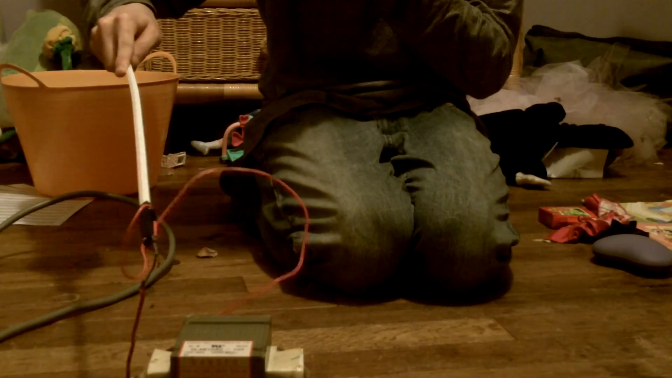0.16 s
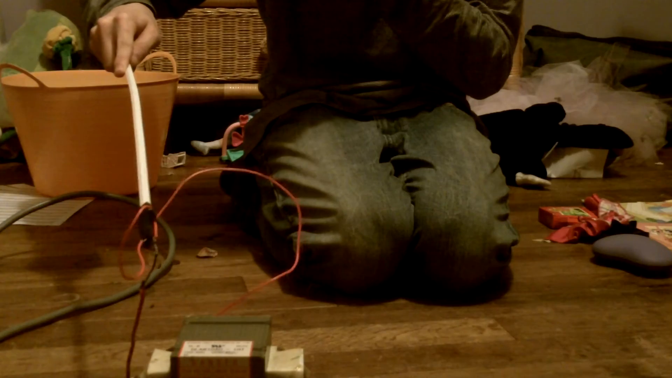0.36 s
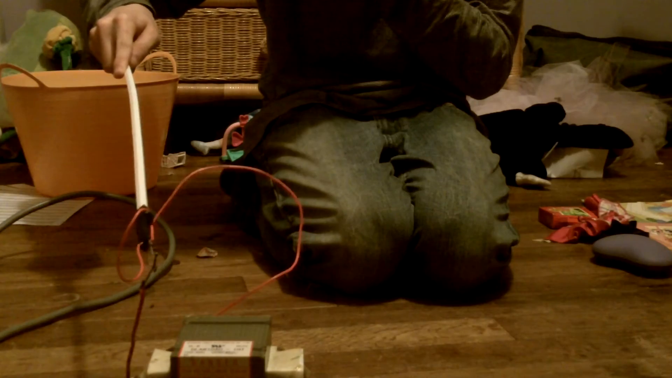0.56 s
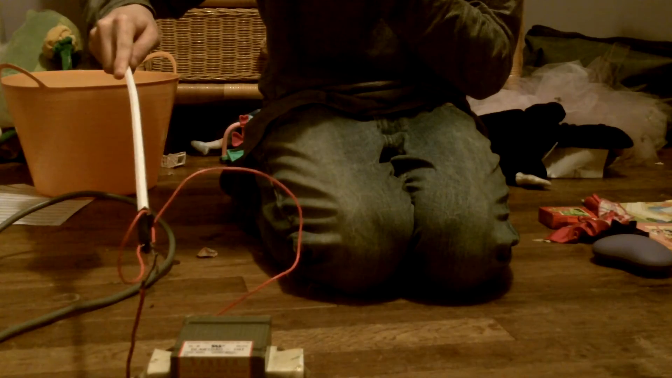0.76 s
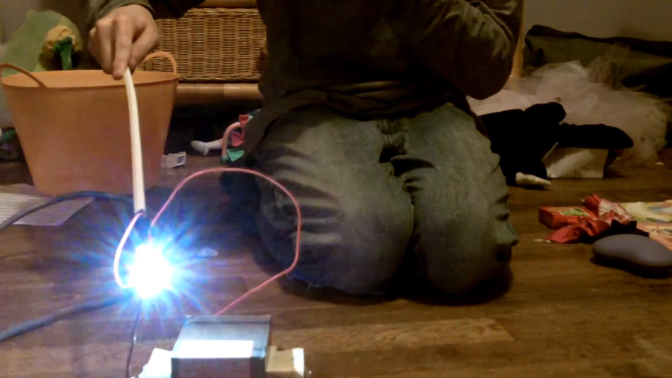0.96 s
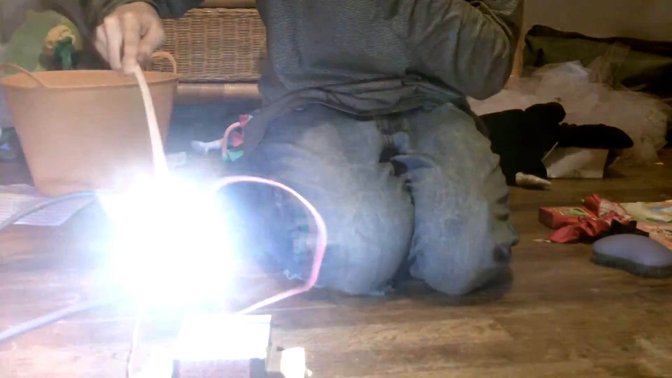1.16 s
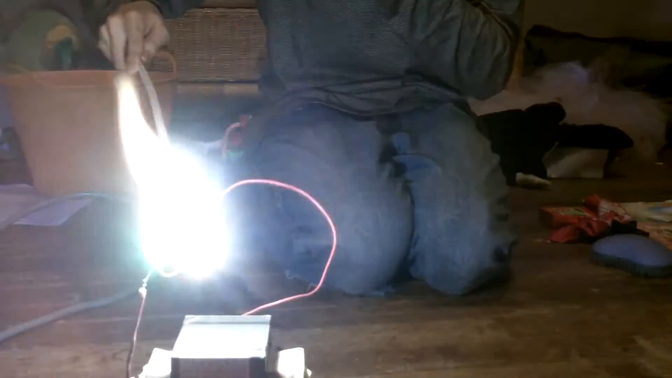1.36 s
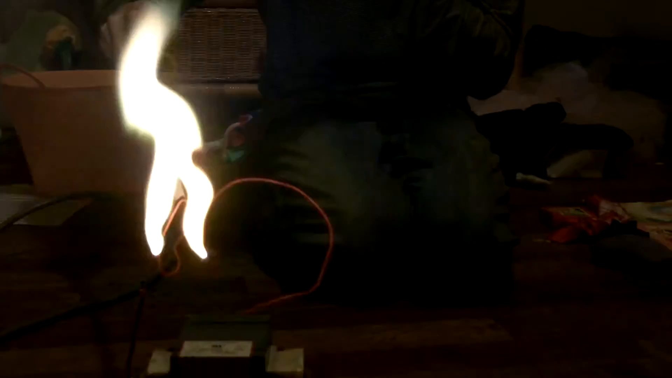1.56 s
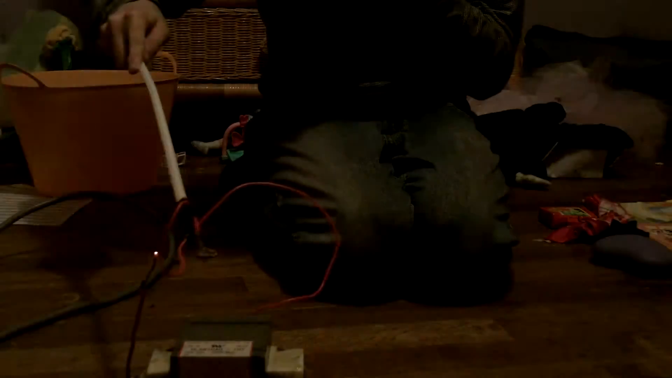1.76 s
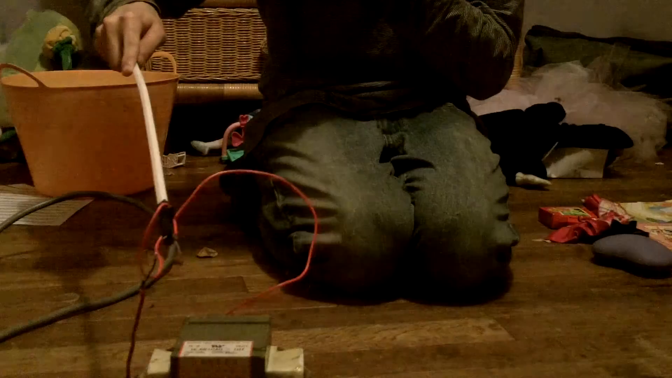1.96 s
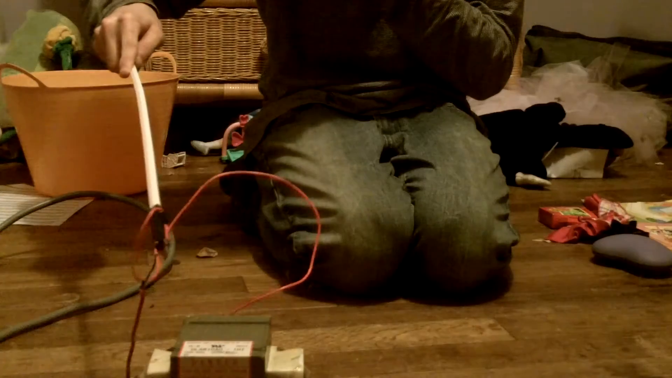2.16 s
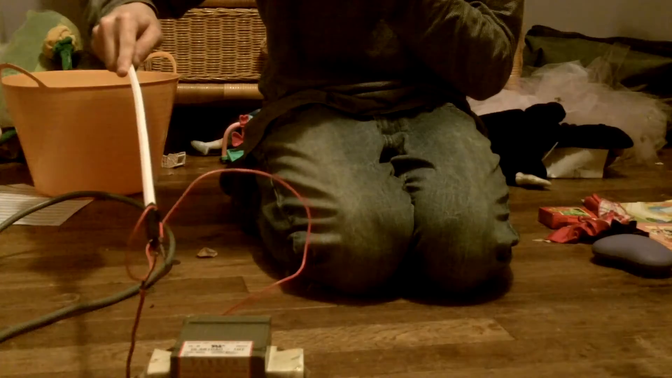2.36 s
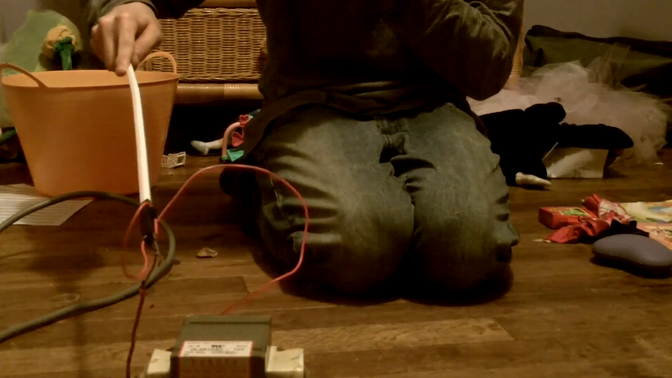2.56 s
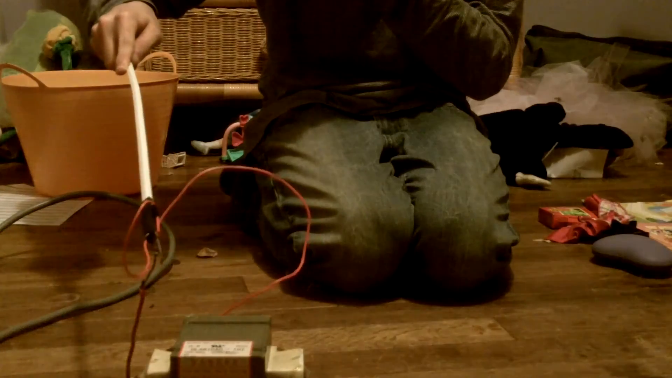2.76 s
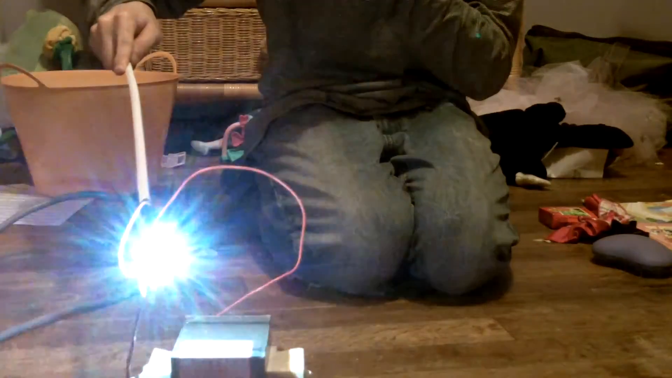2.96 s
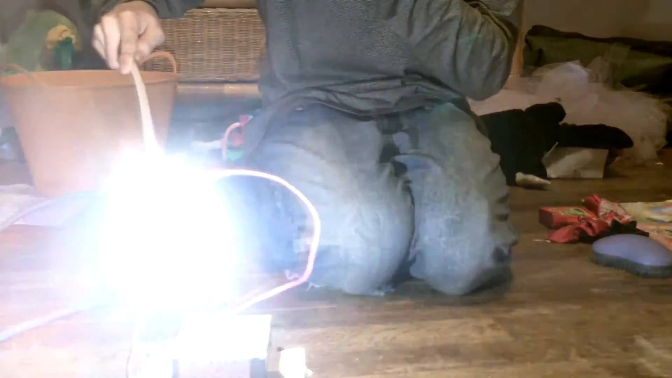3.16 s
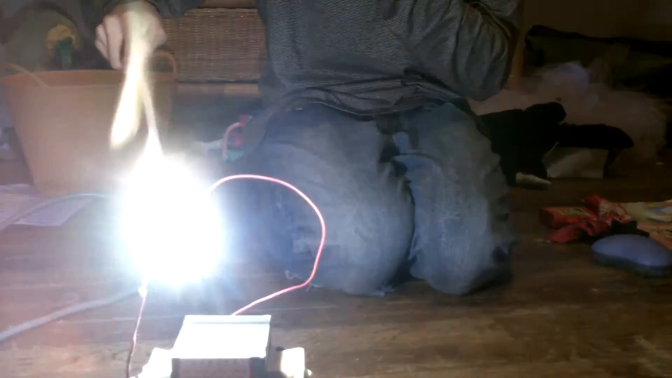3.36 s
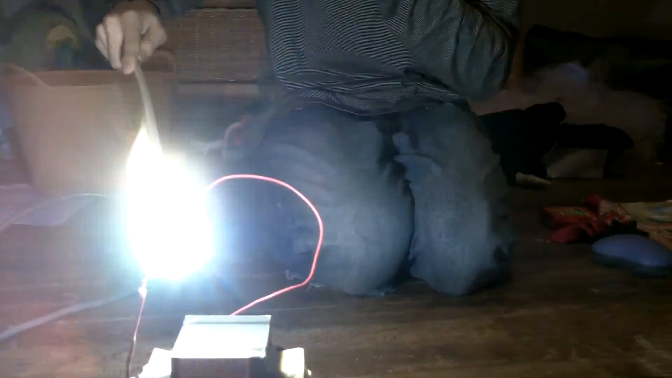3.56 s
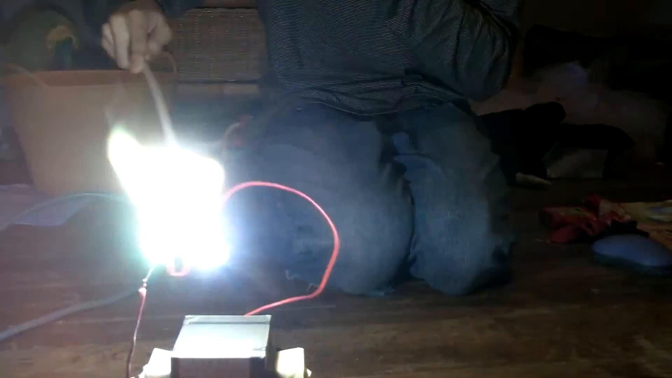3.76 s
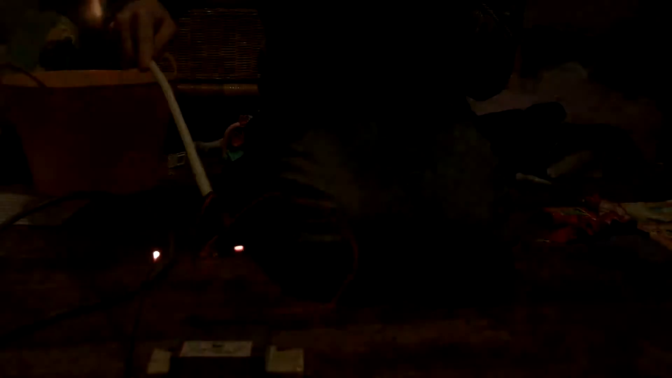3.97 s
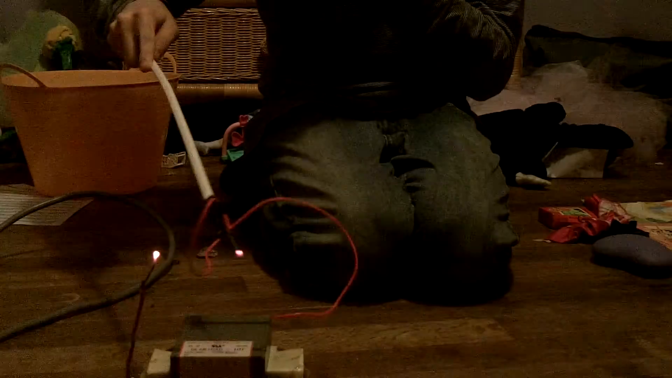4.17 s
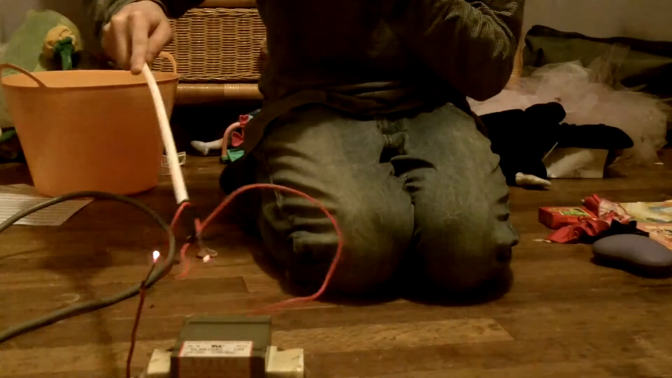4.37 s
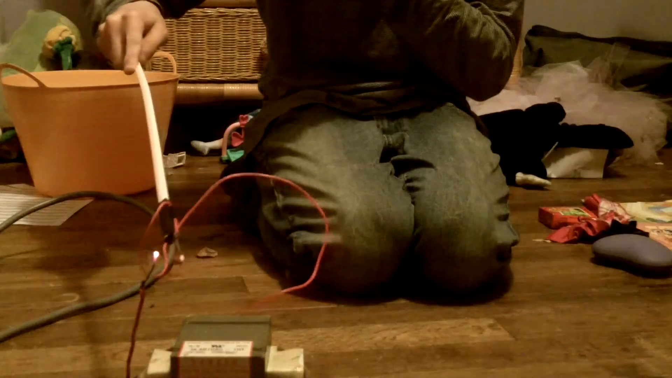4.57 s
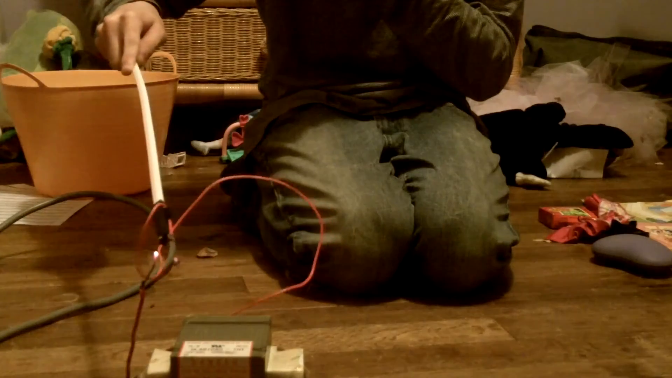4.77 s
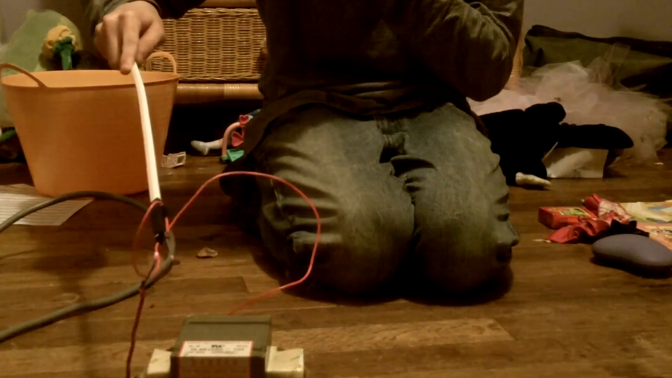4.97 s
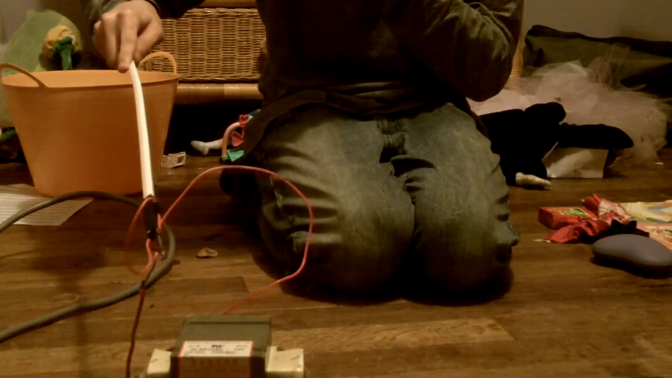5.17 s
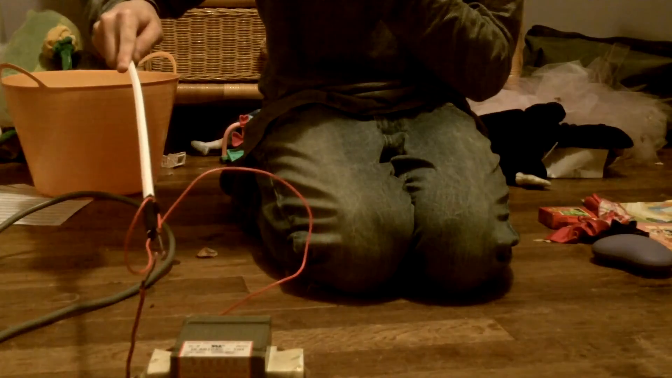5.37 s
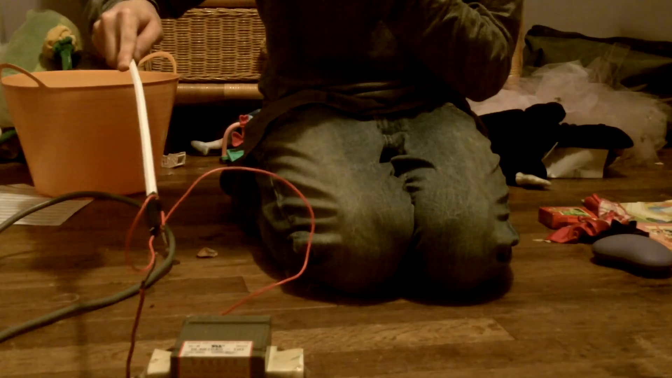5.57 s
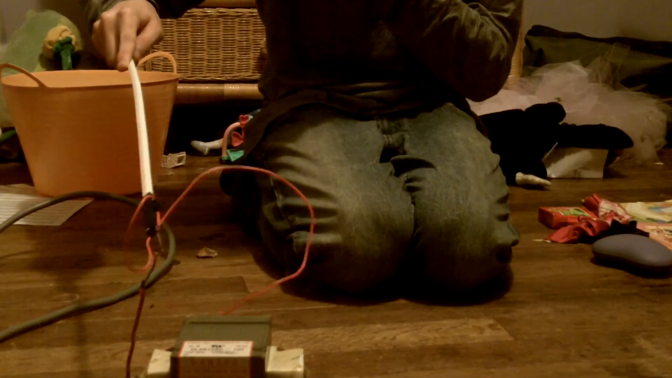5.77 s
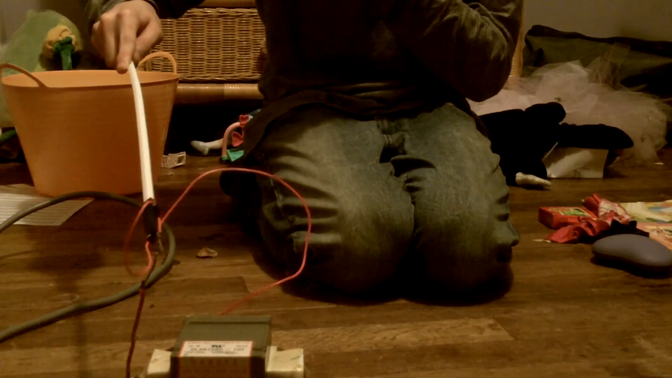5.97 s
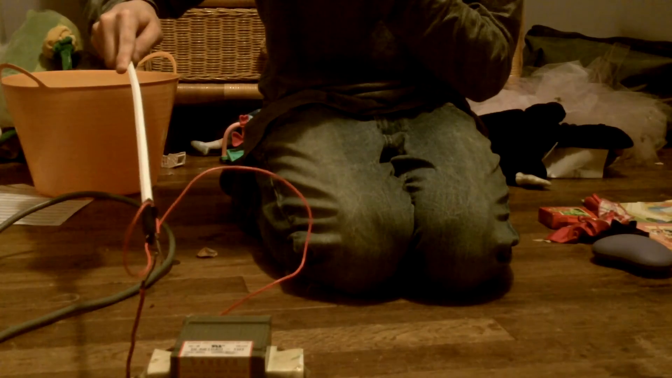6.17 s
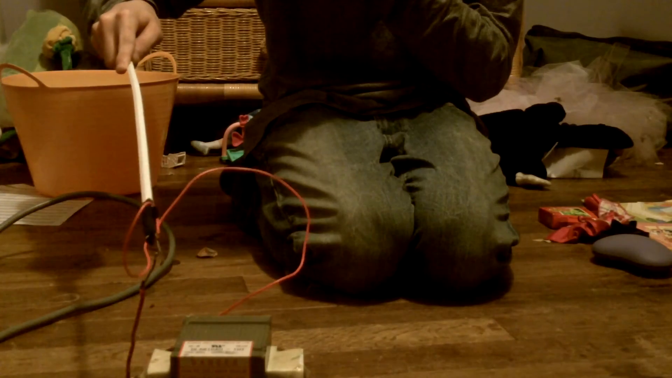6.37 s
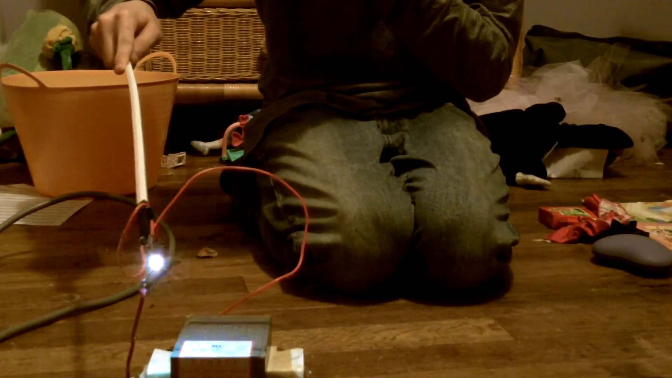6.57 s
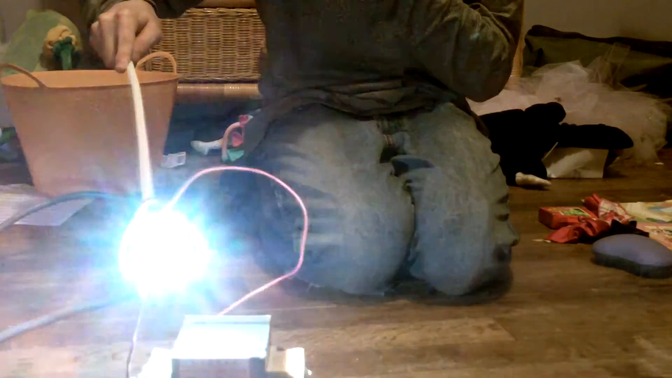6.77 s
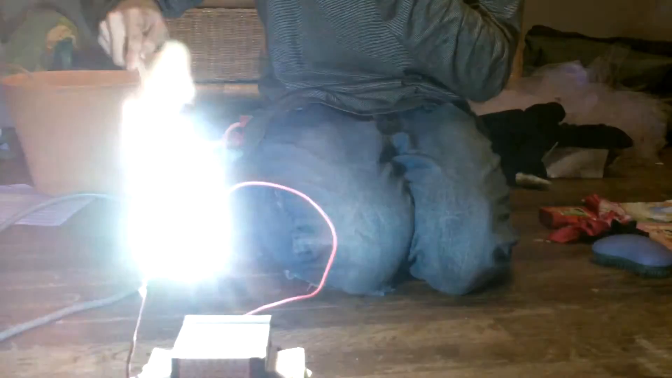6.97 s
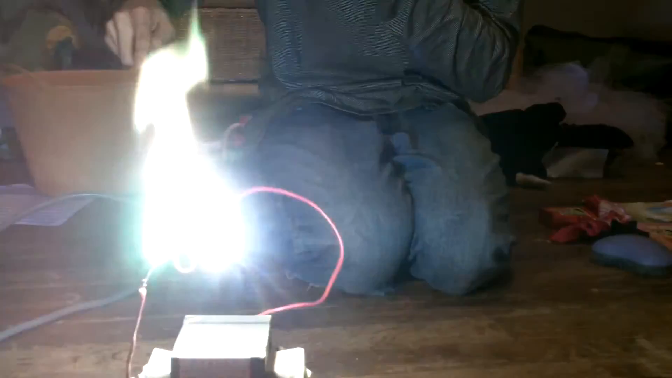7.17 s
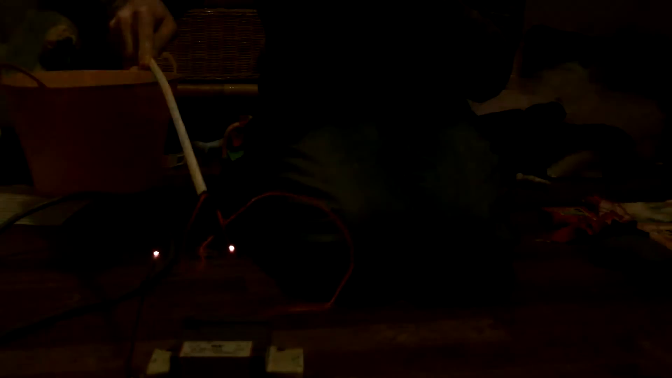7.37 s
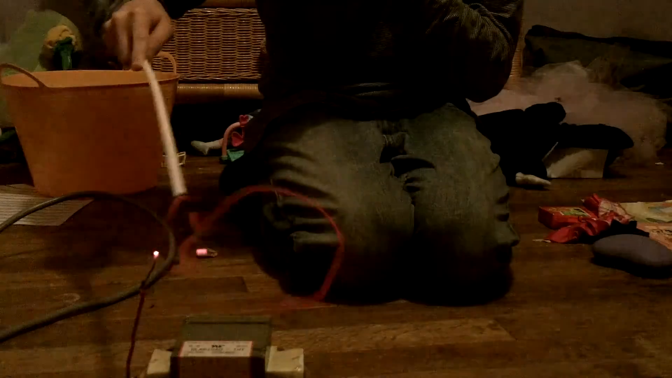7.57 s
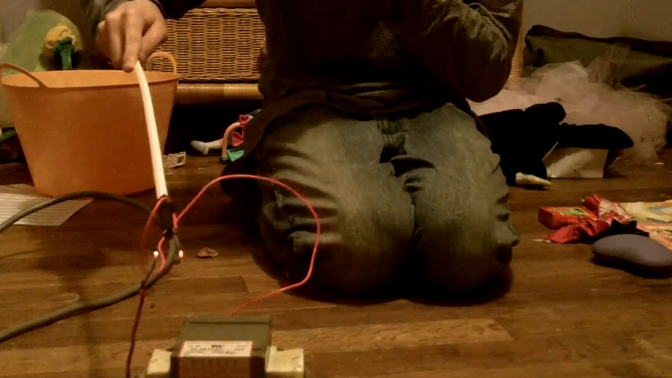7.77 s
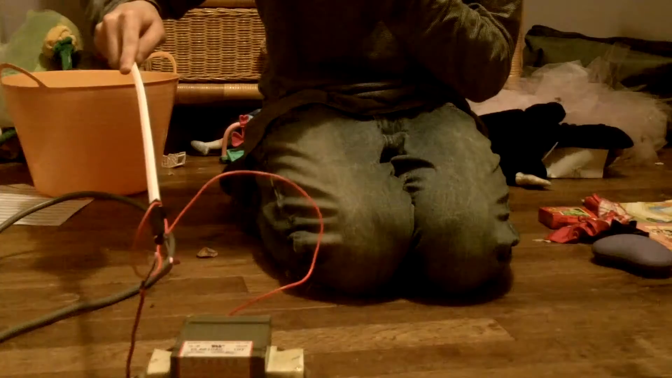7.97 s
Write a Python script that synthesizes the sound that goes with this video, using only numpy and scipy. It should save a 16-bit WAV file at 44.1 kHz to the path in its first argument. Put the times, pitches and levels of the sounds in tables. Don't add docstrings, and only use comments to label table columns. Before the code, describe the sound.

Quiet room at first: low airy rumble, a faint transformer hum buzzing on mains multiples, and a very thin high electronic whine with tiny rapid ticks. At 0.9 s an arc strikes with a snap, a bright, dry, fizzing 120-per-second buzz; from about 1.15 s it opens into a much louder, rasping flame with heavy thumps and hard cracks, ending abruptly at 1.6 s. Hum returns. At 2.9 s a second arc starts the same way, swells by 3.2 s and burns restlessly until 3.9 s, ragged and fluttering, with irregular pops, spitting and thin treble sparks. Quiet hum again until 6.6 s, when the last arc buzzes on, grows full by 6.9 s, somewhat smoother and calmer, and cuts at 7.3 s. Each cutoff leaves a dull puff and short room reflections. Faint hum and hiss to about 8 s. Close, small hard-floored room.

```python
import sys
import numpy as np
from scipy import signal
from scipy.fft import rfft, irfft, next_fast_len
from scipy.io import wavfile
from scipy.ndimage import uniform_filter1d

SR = 44100
rng = np.random.default_rng(int(sys.argv[2]) if len(sys.argv) > 2 else 0)


def wav_record(signal):
    frames = np.transpose(np.atleast_2d(signal))
    bounded = np.clip(frames, -1, 1)
    quanta = np.round(bounded * 32767).astype(np.int16)
    wavfile.write(sys.argv[1], SR, quanta)


def attenuation_scalar(level_db):
    decades = np.asarray(level_db, float) / 20
    return 10 ** decades


N = 353417
TIME = np.arange(N) / SR
SIZE = next_fast_len(N + SR)
FREQ = np.arange(SIZE // 2 + 1) * SR / SIZE
MAINS_HZ, FRAME_HZ = 60.0, 29.97
ZEROS_HZ = 2 * MAINS_HZ


def shape(points):
    hz, db = np.transpose(points)
    gain = attenuation_scalar(np.interp(np.log(FREQ + 1), np.log(hz), db, right=-99))
    return gain / np.sqrt(np.mean(gain ** 2))


def causal(gain):
    cepstrum = irfft(np.log(gain + 1e-4), SIZE)
    cepstrum[1:SIZE // 2] *= 2
    cepstrum[SIZE // 2 + 1:] = 0
    return np.exp(rfft(cepstrum))


def through(x, gain):
    return irfft(rfft(x, SIZE) * gain, SIZE)[:N]


def clicks(s, size):
    at = np.floor(s * SR).astype(int)
    part = s * SR - at
    early = np.bincount(at, size * (1 - part), N + 1)[:N]
    late = np.bincount(at + 1, size * part, N + 1)[:N]
    return early + late


# pitch_hz, level_db
AIR_COLOUR = [(8, -20), (20, -4.5), (60, -2), (150, -10), (400, -16), (1000, -22), (3000, -25), (4000, -30),
              (4700, -26), (5200, -33.5), (7000, -41), (8300, -47.5), (10000, -37.5), (13500, -37.5),
              (15270, -34.5)]


def air():
    return attenuation_scalar(-63) * through(rng.standard_normal(N), shape(AIR_COLOUR))


# frame_rate_multiple, level_db
SIDE_TONES = [(157, -100.5), (220, -100.5), (237, -102), (378, -104)]


def whine():
    frame = TIME * FRAME_HZ % 1
    dropout = uniform_filter1d(1. * (np.abs(frame - .465) < .06), size=40)
    tone = np.sqrt(2) * attenuation_scalar(-75) * (1 - 1.02 * dropout) * np.sin(2 * np.pi * 158 * FRAME_HZ * TIME)
    side = sum(np.sqrt(2) * attenuation_scalar(db) * np.sin(2 * np.pi * round(k) * FRAME_HZ * TIME) for k, db in SIDE_TONES)
    ticks = clicks((np.arange(478) + .965) / 2 / FRAME_HZ, np.full(478, attenuation_scalar(-62)))
    tick_band = (FREQ > 4300) / (1 + ((FREQ - 7000) / 2200) ** 6)
    return tone * attenuation_scalar(-1.5) + side + attenuation_scalar(4.5) * through(ticks, tick_band)


# mains_multiple, level_db
IDLE_CORE = [(1, -87), (2, -81.5), (4, -67.5), (6, -71.5), (8, -76), (10, -86.5), (12, -96), (14, -85)]
# mains_multiple, level_db
LOADED_CORE = [(1, -69), (2, -63.5), (3, -68)]
# start_s, end_s
BURNS = [
    (.886, 1.606),
    (2.886, 3.886),
    (6.637, 7.298),
]


def hum():
    buzz, drone = 0, 0
    for k, db in IDLE_CORE:
        phase = 2 * np.pi * round(k) * MAINS_HZ * (TIME - .0039) + 0.45 * k - 1.2
        buzz = buzz - np.sqrt(2) * attenuation_scalar(db) * np.cos(phase)
    for k, db in LOADED_CORE:
        drone = drone + np.sqrt(2) * attenuation_scalar(db) * np.sin(2 * np.pi * round(k) * MAINS_HZ * TIME)
    idle = 1. - sum((TIME > on) & (TIME < off) for on, off in BURNS)
    idle = uniform_filter1d(idle, size=1500)
    return buzz * idle + drone * (1 - idle)


# time_s, thump_db (flame size), crackle_db (of the re-strike)
FLAMES = [
    [(0.89, -77, -50), (0.968, -74.5, -42), (1.198, -38, -46.5), (1.264, -34, -41.5), (1.334, -35.5, -44.5),
     (1.426, -30.5, -48.5), (1.436, -31, -40.5), (1.556, -31.5, -44), (1.6, -34, -45)],
    [(2.89, -74.5, -49), (3.04, -62, -41.5), (3.244, -28.5, -45), (3.302, -33.5, -41.5),
     (3.438, -31.5, -41), (3.578, -36.5, -46.5), (3.62, -34.5, -40.5), (3.874, -30.5, -48),
     (3.88, -36.5, -41)],
    [(6.64, -72, -47.5), (6.812, -58.5, -41.5), (6.918, -36, -46), (7.024, -32, -46), (7.1, -31.5, -44.5),
     (7.136, -32, -47), (7.17, -30.5, -46), (7.284, -34, -44), (7.29, -34.5, -54)],
]
# time_s, unrest (0-1)
UNREST = [(1.3, 1.0), (3.5, 1.0), (7.0, .65)]
POLARITY_DB = [1, -4, -0.5]


def half_cycles():
    rows = []
    for (on, off), table in zip(BURNS, FLAMES):
        s = np.arange(np.ceil(on * ZEROS_HZ - .6), off * ZEROS_HZ - .6) / ZEROS_HZ + .0050
        when, *levels = np.transpose(table)
        rows.append([s] + [np.interp(s, when, level) for level in levels])
    s, size_db, crackle_db = np.hstack(rows)
    unrest = np.interp(s, *np.transpose(UNREST))
    busy_db = crackle_db + 46.5

    grown_db = -38
    snap_db = -45 + 0.36 * np.minimum(size_db - grown_db, 0) + busy_db
    which = np.searchsorted(np.transpose(BURNS)[0], s) - 1
    side = (-1) ** np.round(s * ZEROS_HZ - .6)
    snap_db = snap_db + np.take(POLARITY_DB, which) * side * (size_db > grown_db)

    short_db = -59.5 - 0.33 * np.maximum(size_db + 59, 0)
    long_db = -63.5 + 0.77 * (size_db + 34.5) - 4 * (1 - unrest)
    fizz_db = 20 * np.log10(np.hypot(attenuation_scalar(short_db), attenuation_scalar(long_db))) + 0.79 * busy_db
    return s, unrest, size_db - 2.51, snap_db, crackle_db - 1.5, fizz_db


# time_s, peak_db, brightness_db
CRACKS = [(0.938, -37.5, 10), (1.4037, -30, 4.5), (1.13, -23.5, -30), (1.1475, -17, -10),
          (1.2228, -12, -20), (1.2557, -11, -4.5), (1.2889, -14, -20), (1.4311, -19.5, -24),
          (1.439, -13.5, -9), (1.4725, -14.5, -21), (1.4895, -20.5, -12), (3.0968, -26, -2),
          (3.13, -18, -8), (3.2059, -14.5, -25), (3.6638, -18.5, -34), (3.2475, -14, -17),
          (3.2556, -15, -12), (3.331, -19.5, -11), (3.369, -16.5, -16), (3.3638, -29.5, 2),
          (3.4137, -13, -19), (3.4288, -21.5, 0), (3.489, -17.5, -13), (3.5306, -19.5, -13),
          (3.6472, -17.5, -22), (3.6965, -23, -4.5), (3.745, -28.5, 1), (6.8458, -21, -7),
          (7.014, -21, -25), (7.133, -19, -24)]
# time_s, peak_db (of the fizz)
SPARKS = [(1.2145, -44), (1.479, -38), (1.5704, -37), (1.5973, -39), (3.2959, -45), (3.3124, -40),
          (3.3298, -40), (3.3458, -40), (3.3633, -32), (3.3967, -39), (3.4301, -36), (3.5299, -46),
          (3.6296, -44), (3.6965, -49), (3.7464, -38), (3.8819, -44.5), (6.9641, -44), (7.2629, -40)]


def cracks():
    at, peak_db, bright_db = np.transpose(CRACKS)
    top_db = -34 + 0.52 * (bright_db + 10) - .6 * (peak_db + 21)
    first = [(on + 0.00066, -47.5, 2, 3) for on, _ in BURNS]
    body_db = -30.5
    thin = [(s, body_db, -1.5, db - body_db + 3) for s, db in SPARKS]
    return np.hstack([[at, peak_db, bright_db, top_db], np.transpose(first + thin)])


def strikes(s, rough, level_db, at, crack_db, points, snap_db, gas_db, glow_s):
    free = np.abs(s[:, None] - at).min(axis=1) > .003
    size = attenuation_scalar(level_db + 4.53 * rough * rng.standard_normal(len(s)))
    snap = clicks(s, free * size * attenuation_scalar(snap_db) * np.sqrt(SR / ZEROS_HZ)) + clicks(at, attenuation_scalar(crack_db))
    flutter = uniform_filter1d(rng.standard_normal(N), size=9)
    gas = rng.standard_normal(N) * attenuation_scalar(11.0 * flutter)
    glow = np.exp(-TIME[:700] / glow_s)
    sizzle = gas * signal.fftconvolve(clicks(s, size * attenuation_scalar(gas_db)), glow)[:N]
    return through(snap + sizzle, causal(shape(points)))


# pitch_hz, level_db
SNAP_COLOUR = [(300, -24), (800, -12), (1200, -10.5), (1430, -5.5), (1620, -7), (1830, 0), (2100, -8),
               (2500, -8.5), (3500, -10.5), (5000, -30)]
# pitch_hz, level_db
SPIT_COLOUR = [(1200, -55.5), (2000, -9), (2450, 8.5), (2800, 2), (3200, -8.5), (3700, 5), (4750, -2),
               (5500, -5), (6300, -8.5), (7300, -23.5), (8500, -35)]
# pitch_hz, level_db
FIZZ_COLOUR = [(6500, -12.5), (8300, -13.5), (9800, -8.5), (10700, -9), (11600, -3), (13700, -10),
               (14500, -13), (15300, -22), (15700, -30)]


def restrike(s, rough, snap_db, spit_db, fizz_db):
    at, peak_db, bright_db, top_db = cracks()
    at = at + 0.000798
    strike = s + 0.00018 + 0.000794 * rough ** 2 * np.abs(rng.standard_normal(len(s)))
    snap = strikes(strike, rough, snap_db, at, peak_db + 7.5, SNAP_COLOUR,
                   snap_db=-5.0, gas_db=-8, glow_s=0.0018)
    spit = strikes(strike, rough, spit_db, at, peak_db + bright_db + 12.0, SPIT_COLOUR,
                   snap_db=-7, gas_db=0.5, glow_s=0.0028)
    fizz = strikes(strike, rough, fizz_db, at, peak_db + top_db + 11.0, FIZZ_COLOUR,
                   snap_db=-13.0, gas_db=-3.9, glow_s=0.0059)
    return snap + spit + fizz


# delay_ms, level_db
BOUNCES = [(.55, -3), (1.25, -9), (2.8, -12), (3.3, -11)]


def floor(x):
    dull = 1 / (1 + 1j * FREQ / 2500) ** 2
    echo = sum(attenuation_scalar(db) * np.exp(-2j * np.pi * FREQ * ms / 1000) for ms, db in BOUNCES)
    return through(x, 1 + dull * echo)


# pitch_hz, t60_s, level_db
ROOM_DECAY = [(153, 0.37, -6), (513, 0.18, 0), (1670, 0.23, -4), (5130, 0.22, -2.5), (12000, 0.26, -12)]


def room():
    t, total = TIME[:SR // 2], 0
    hz = np.log([row[0] for row in ROOM_DECAY])
    for k, (_, t60, db) in enumerate(ROOM_DECAY):
        onset = np.clip((t - .003) / 0.00056, 0, 1)
        tail = rng.standard_normal(len(t)) * attenuation_scalar(-60 * t / t60) * onset
        band = np.sqrt(np.interp(np.log(FREQ + 1), hz, np.arange(len(hz)) == k))
        total = total + attenuation_scalar(db) * band * rfft(tail / np.sqrt(np.sum(tail ** 2)), SIZE)
    return total


# pitch_hz, level_db
ROAR_COLOUR = [(15, -49), (40, -109), (100, 4.5), (180, -11.5), (300, -5), (600, -14.5), (1000, -8),
               (1500, -15.5)]


def roar(s, thump_db, rough):
    at, peak_db = np.transpose(CRACKS)[:2]
    puffs = clicks(at + 0.0009, np.interp(at, s, rough) ** 3 * attenuation_scalar(peak_db - 1.0))
    puffs = puffs + clicks(np.transpose(BURNS)[1] - 0.0041, np.full(len(BURNS), attenuation_scalar(-17)))
    half_cycle = 368
    swell = uniform_filter1d(clicks(s, attenuation_scalar(thump_db - 24 + 12 * rough) * half_cycle), size=half_cycle)
    burning = through(rng.standard_normal(N) * swell, shape(ROAR_COLOUR))
    return through(puffs, causal(shape(ROAR_COLOUR))) + burning


THUMP_DB = [-31, -4, -13, 1, -14.5, -2, -23, -3, -19.5, -6, -75, -17, -25, -12, -19.5, -22, -38, -16.5]


def collapse(s, thump_db, rough, walls):
    luck = rng.standard_normal((len(s), 2)).T
    size = -np.sqrt(SR / ZEROS_HZ) * attenuation_scalar(thump_db + 1.3 * rough * luck[1])
    wander = uniform_filter1d(rng.standard_normal(len(s)), size=5)
    when = s + .0011 * (rough - .75) + 0.00031 * 2 * rough * wander + .0001 * rough * luck[0]

    hz = MAINS_HZ * np.arange(1, len(THUMP_DB) + 1)
    standing = walls[np.round(hz * SIZE / SR).astype(int)]
    own_db = THUMP_DB - np.clip(20 * np.log10(np.abs(standing)), -7, 12)
    turn = np.angle(standing)

    lag = np.exp(-1j * 0.15 * np.log2(FREQ / 300 + 0.14))
    ripple = .55 * np.cos(2 * np.pi * FREQ * 4.17 / 1000)
    lag = lag * np.exp(1j * ripple + 1j * np.pi * (FREQ > 700))

    upper = 1 / (1 + (520 / (FREQ + 1)) ** 6)
    small_db = np.clip(-.45 * (thump_db + 24.5), -4, 12)
    out = 0
    for first, sign in ((1, 1), (0, (-1) ** np.round(s * ZEROS_HZ))):
        points = [(25, -60), *zip(hz[first::2], own_db[first::2]), (1500, -55)]
        point_hz, point_db = np.transpose(points)
        gain = attenuation_scalar(np.interp(np.log(FREQ + 1), np.log(point_hz), point_db))
        gain = gain * np.exp(-1j * np.interp(FREQ, hz[first::2], turn[first::2])) * lag
        push = clicks(when, sign * size)
        quick = clicks(when, sign * size * attenuation_scalar(small_db))
        out = out + through(push, attenuation_scalar(19.5) * gain * (1 - upper))
        out = out + through(quick, attenuation_scalar(17.5) * gain * upper)
    return out


def arc():
    s, unrest, thump_db, snap_db, spit_db, fizz_db = half_cycles()
    rough = np.clip((thump_db + 60.5) / 25, .3, 1) * unrest
    sharp = floor(restrike(s, rough, snap_db, spit_db, fizz_db))
    steps = .6 * np.sqrt(rough) * rng.standard_normal(len(s))
    place = np.interp(TIME, s, np.cumsum(steps))
    echoes = through(sharp * np.cos(place), room()) + through(sharp * np.sin(place), room())
    walls = 1 + room()
    flame = through(roar(s, thump_db, rough) + collapse(s, thump_db, rough, walls), walls)
    return flame + sharp + echoes


def scene():
    return (air() + hum() + arc())[None]


# pitch_hz, width_hz, gain_left
NOTCHES = [(4200, 330, .02), (7880, 900, .2), (8820, 800, .06), (12600, 500, .05), (12800, 200, .15)]


def microphone(x):
    case = 1
    for hz, width, left in NOTCHES:
        detune = 2j * (FREQ - hz) / width
        case = case * (left + detune) / (1 + detune)
    return through(x, case / (1 + (FREQ / 15550) ** 120))


def roll_off(x):
    return signal.sosfilt(signal.butter(12, 16460, fs=SR, output="sos"), x)


def record(dry):
    mix = (microphone(dry[0]) + whine())[None]
    return roll_off(mix)


dry = scene()
out = record(dry)
wav_record(out)
```